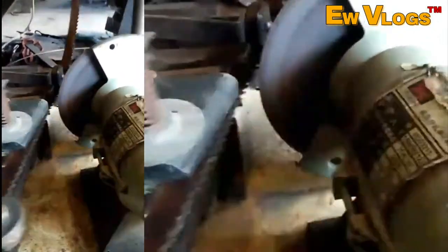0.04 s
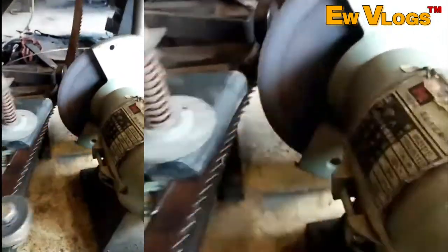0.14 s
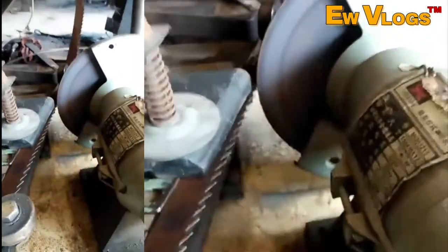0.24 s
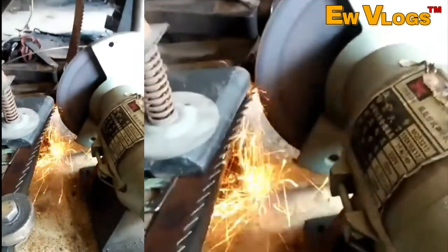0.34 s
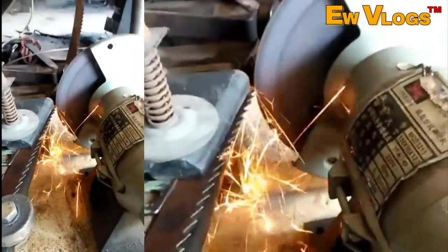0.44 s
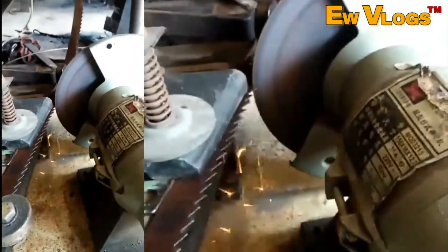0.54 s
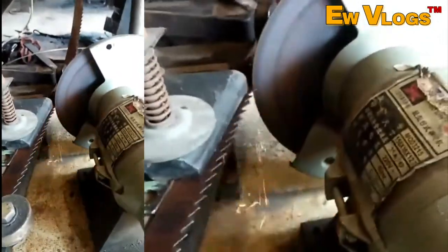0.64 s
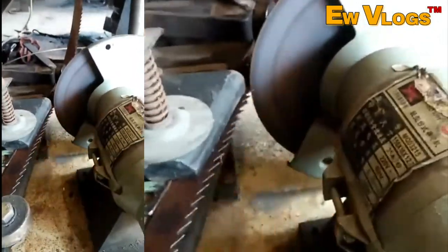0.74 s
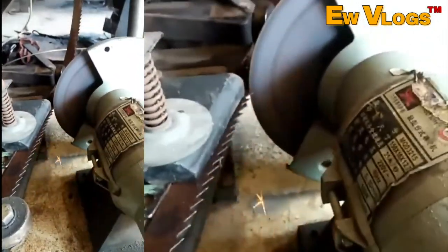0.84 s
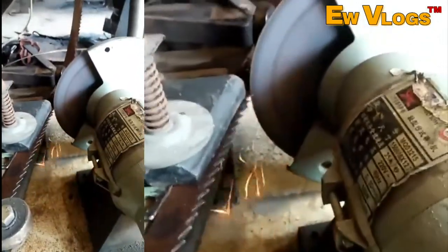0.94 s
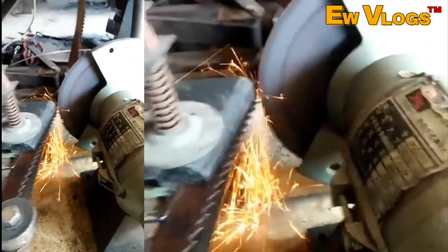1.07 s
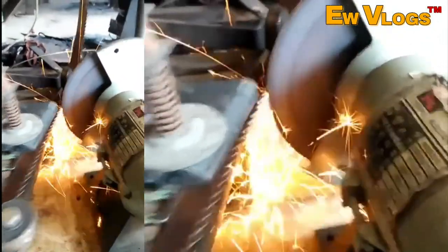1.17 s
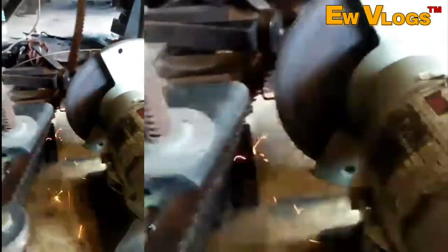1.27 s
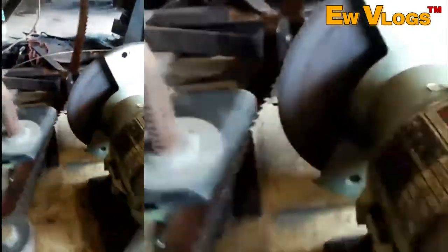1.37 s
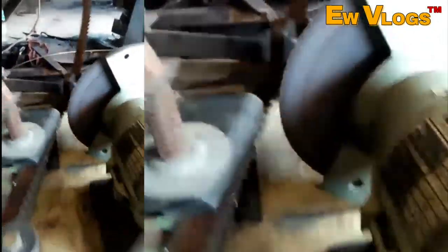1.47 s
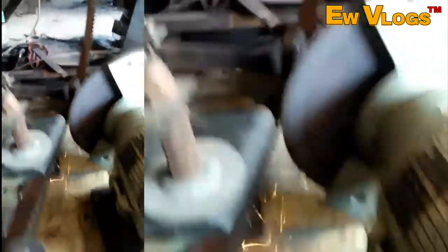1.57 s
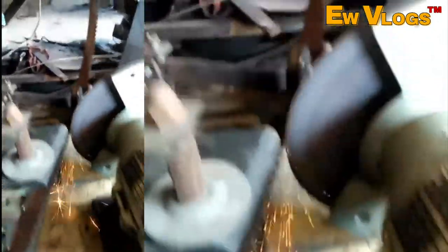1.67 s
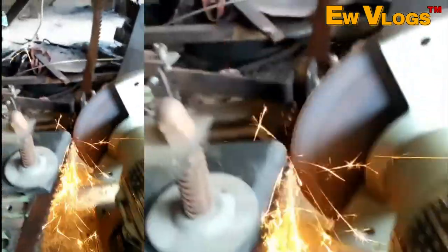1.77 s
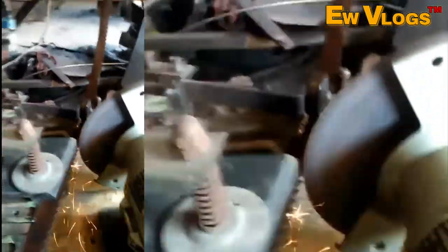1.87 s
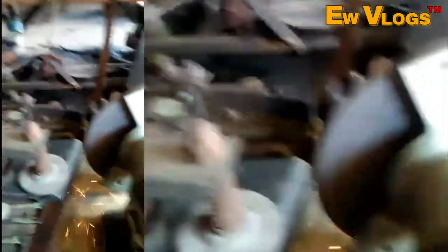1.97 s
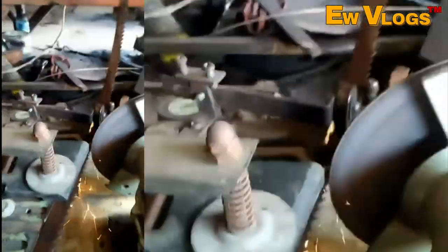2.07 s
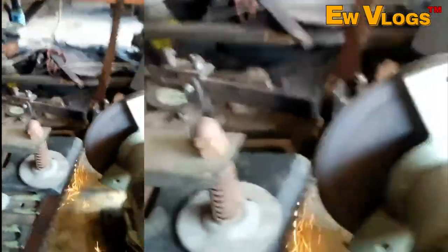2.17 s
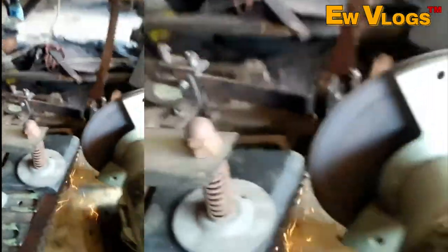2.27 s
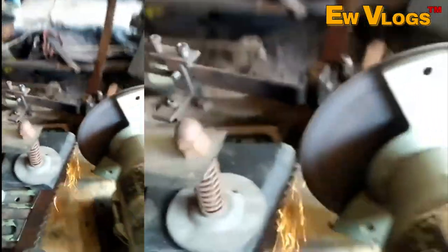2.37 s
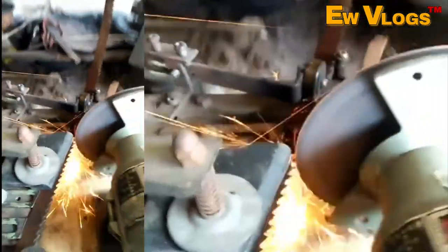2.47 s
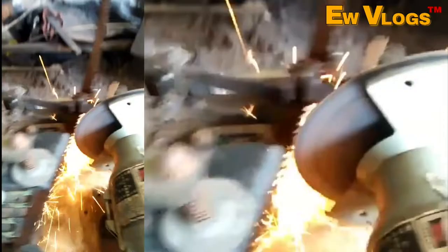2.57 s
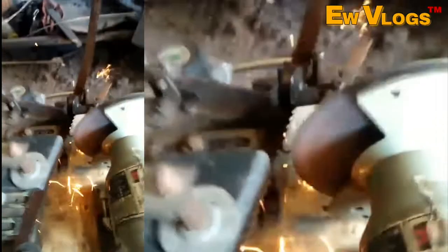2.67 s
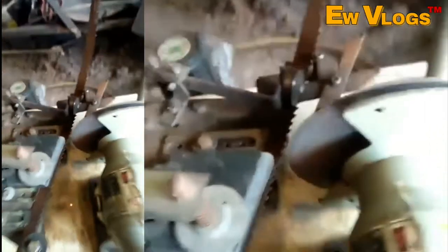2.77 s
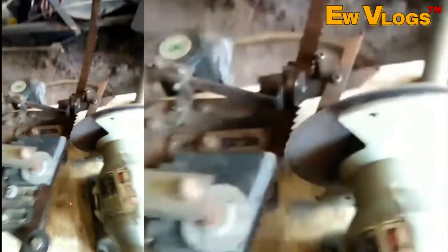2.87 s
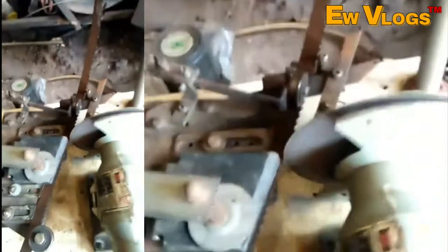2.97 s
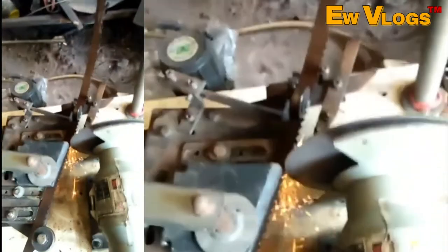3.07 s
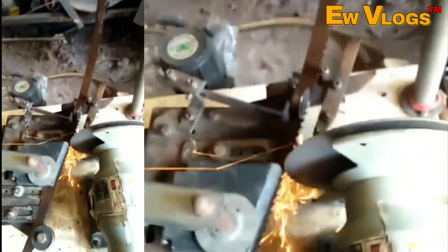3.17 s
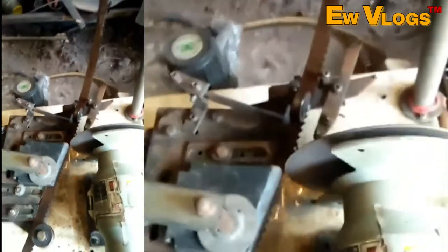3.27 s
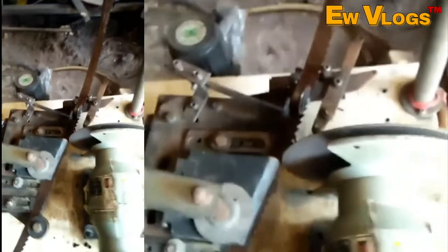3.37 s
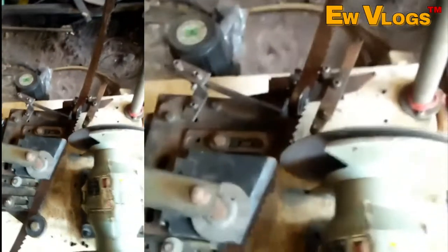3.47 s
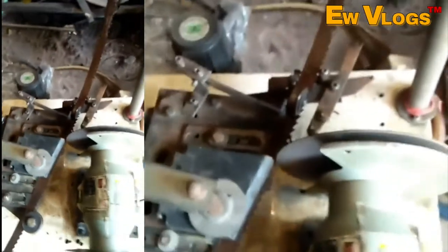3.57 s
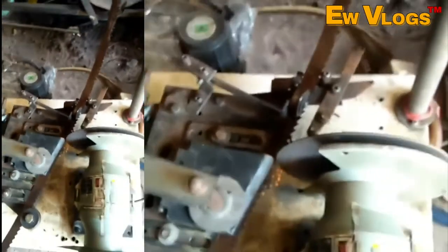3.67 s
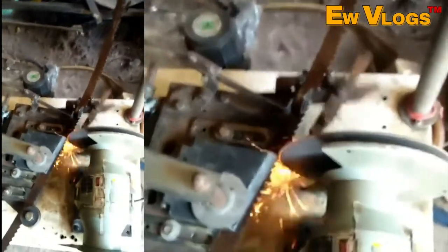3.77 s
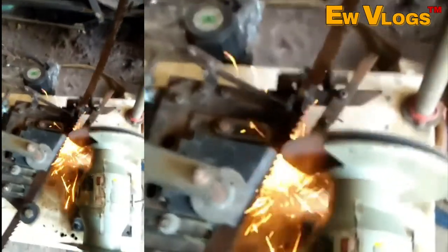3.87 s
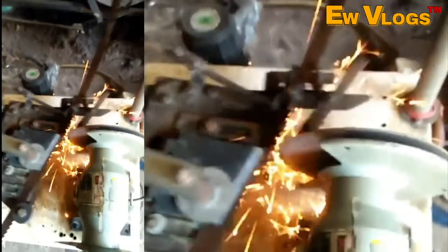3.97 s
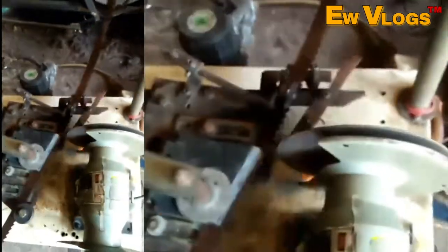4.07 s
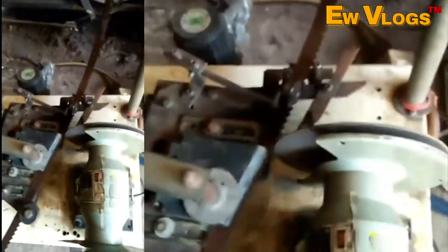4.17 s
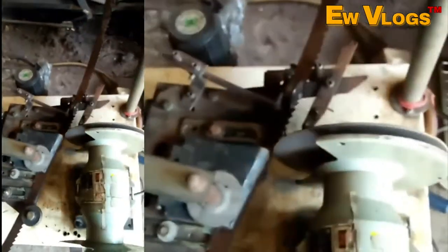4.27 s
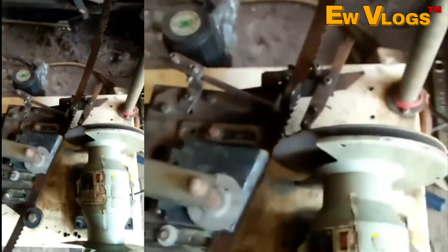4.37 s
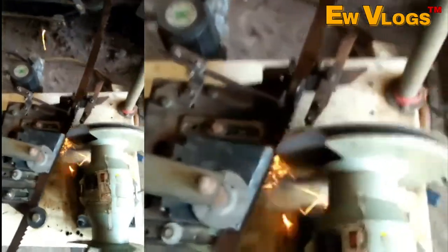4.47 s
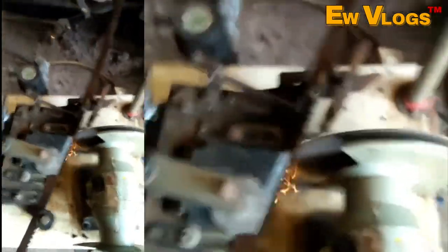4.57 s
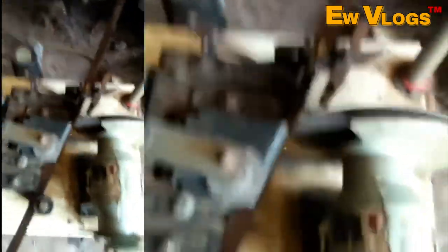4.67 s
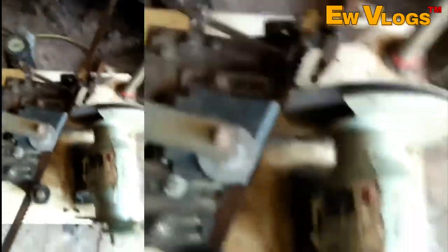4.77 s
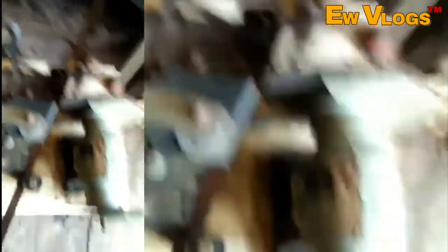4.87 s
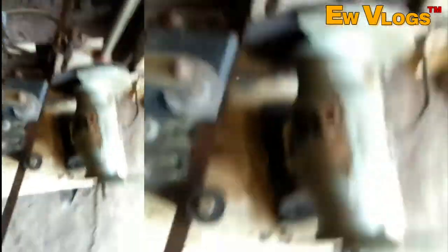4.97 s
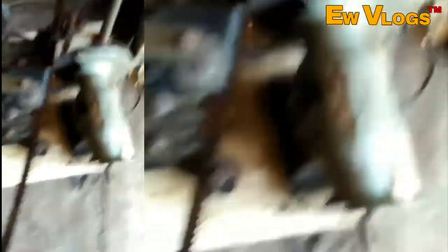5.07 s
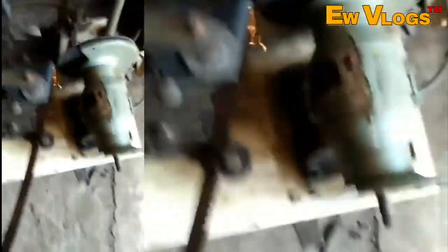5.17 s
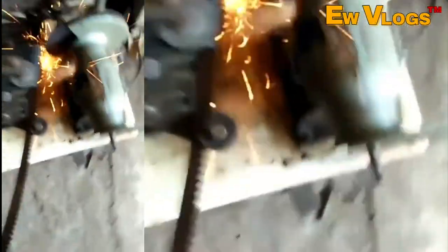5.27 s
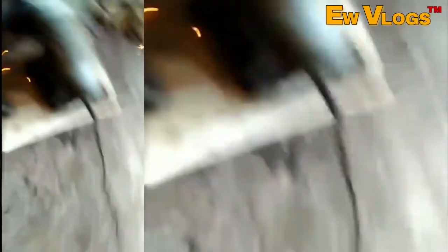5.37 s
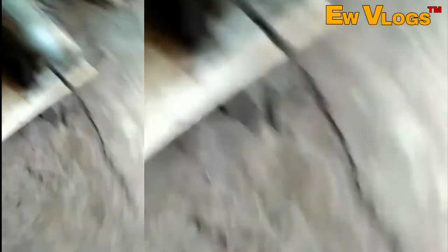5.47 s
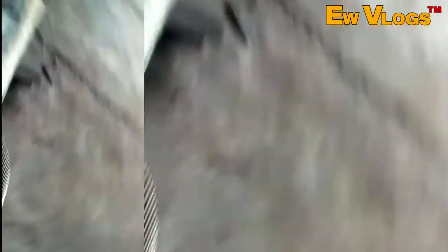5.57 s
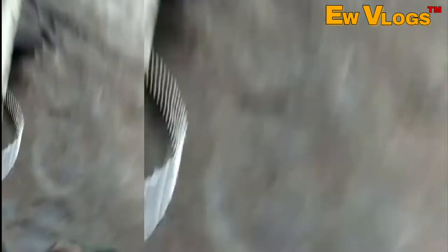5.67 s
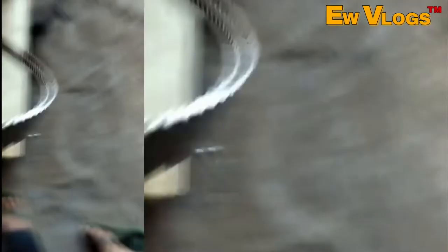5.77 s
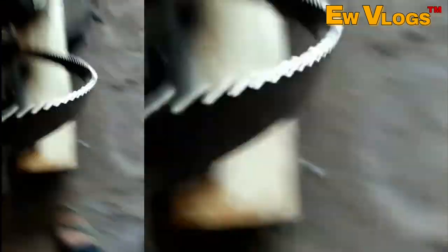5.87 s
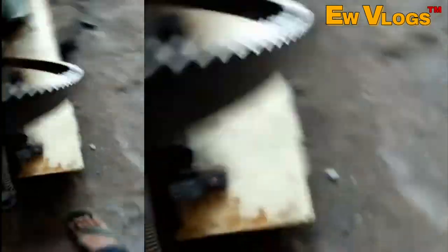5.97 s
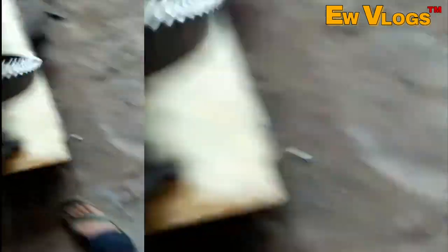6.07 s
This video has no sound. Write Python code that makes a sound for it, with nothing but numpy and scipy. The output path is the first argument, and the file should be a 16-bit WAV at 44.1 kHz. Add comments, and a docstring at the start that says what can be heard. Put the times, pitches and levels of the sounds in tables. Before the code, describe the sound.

A grinding wheel sharpens a steel saw blade, close up in a small, slightly reverberant workshop. A quiet motor hum and rattling gear rumble swell and ease throughout, with occasional dull knocks. After a brief bite at the very start, a loud, rapidly chattering rasp with a ringing metallic squeal runs from 0.5 seconds to a deep bite at 1.3. A fuller, continuous rasp follows from 1.7 to 2.7 seconds, ending in another deep bite. The clamp groans low under the heaviest bites. Lighter, brighter chattering scrapes come between 3.2 and 3.9 seconds, then a hard bite at 4. Stuttering grazes and short squealing brushes run from 4.5 to 5.3 seconds, leading into a loud bite at 5.4. A last rasp sounds around 6 seconds. The microphone overloads slightly on the loudest moments.

```python
"""A bench-grinder wheel sharpens a band-saw blade, tooth after tooth, in a small workshop.
The wheel runs out of true: a light cut chatters once a turn, a deep one rasps without pause as the
wheel speed sags. Grit scrapes the steel, the blade rings and squeals, and its clamp groans.
Underneath, the motor hums and the feed gear rumbles and knocks between teeth.
The close microphone overloads on the loudest bites."""
import sys
import numpy as np
from scipy import signal
from scipy.fft import rfft, irfft, next_fast_len
from scipy.io import wavfile
from scipy.ndimage import uniform_filter1d

SR = 44100
rng = np.random.default_rng(int(sys.argv[2]) if len(sys.argv) > 2 else 0)


def wav_out(sig):
    """Save sig, one row per channel (or a flat mono array), as 16-bit PCM at SR to the path in sys.argv[1]."""
    wavfile.write(sys.argv[1], SR, np.round(np.clip(np.atleast_2d(sig).T, -1, 1) * 32767).astype(np.int16))


N = 269449
TIME = np.arange(N) / SR
BINS = np.fft.rfftfreq(8192, 1 / SR)
RINGING_PASS, RASPING_PASS, LIGHT_GRAZE, DEEP_BITE = range(4)  # tone colour of each grind
CUT_ENVELOPE = dict(attack_s=0.0075, release_s=0.0033, ease_db=-5)

# Wheel speed, sagging in the deep cuts: (time [s], speed [turns/s])
WHEEL_SPEED = [(0, 50.15), (.45, 48.79), (.6, 48.79), (.8, 49.51), (1.25, 49.68), (1.4, 47.43),
               (1.75, 49.68), (1.95, 47.24), (2.25, 49.19), (2.55, 49.14), (2.8, 47.79), (3.3, 49.37),
               (3.9, 49.61), (4.1, 47.56), (4.55, 49.29), (5.3, 49.56), (5.5, 48.16), (6.11, 49.2)]
# Deep plunges of the wheel: (start [s], length [s], force [dB], clamp groan [dB])
DEEP_PLUNGES = [(0, 0.037, -0.5, -22), (1.276, 0.1, 0, -7.5), (2.643, 0.099, 0.5, -8.5),
                (3.941, 0.036, -12.5, -25.5), (3.988, 0.11, 0, -8.5), (5.361, 0.15, 0, -16),
                (5.97, 0.11, -8.5, -42)]
# Cuts along a tooth: (start [s], length [s], force [dB], contact half-width at the bite [turns],
# half-width once settled [turns], timbre [RINGING_PASS, RASPING_PASS or LIGHT_GRAZE])
TOOTH_CUTS = [(0.5, .485, -2, 0.26, 0.056, 0), (.988, 0.31, 1, 0.038, 0.095, 0),
              (1.742, 0.116, 1.5, 0.16, 0.13, 1), (1.86, .25, -3, 0.3, 0.4, 1),
              (2.11, .35, 1, 0.16, .18, 1), (2.461, 0.23, 0, .15, 0.18, 1),
              (3.242, 0.25, -9.5, 0.2, 0.11, 2), (3.73, 0.2, -15, 0.12, 0.12, 2),
              (4.602, 0.19, -6, 0.13, 0.064, 2), (4.98, .17, -47, .33, .3, 2),
              (5.962, 0.21, -7.5, 0.16, 0.79, 2)]
# Runs of grazes by the wheel's high spot: (start [s], grazes [count], spacing [half-turns],
# force [dB], step per graze [dB], timbre [RINGING_PASS or LIGHT_GRAZE])
GRAZE_RUNS = [(.422, 2, 4, -12, 0, 0), (1.727, 1, 0, -7, 0, 0), (3.535, 2, 2, -10.5, -7, 2),
              (3.596, 2, 2, -26, -2, 2), (3.947, 1, 0, -5, 0, 2), (4.476, 1, 0, -26.5, 0, 2),
              (4.516, 3, 4, -17.5, -2.5, 2), (4.651, 1, 0, -5, 0, 2), (4.757, 1, 0, -7, 0, 2),
              (4.862, 2, 1, -15.5, 0, 2), (5.155, 2, 1, -21, 0, 2), (5.196, 2, 1, -19, 2, 2),
              (4.952, 2, 1, -28, -3, 2), (5.114, 2, 1, -37, -6, 2), (5.273, 2, 1, -24, 12, 2),
              (5.326, 3, 1, -16.5, 4.5, 2)]
# Tone of the grit under a firm contact: (frequency [Hz], level [dB])
FIRM_GRIT_EQ = [(30, -38), (95, -25), (190, -22), (450, -13), (850, 2.5), (1400, -3), (2200, 1), (2700, -5),
                (3400, -20.5), (4500, -15.5), (6500, -18), (9000, -15.5), (12500, -21.5), (16000, -43)]
# Brighter tone of the grit under a light contact: (frequency [Hz], level [dB])
LIGHT_GRIT_EQ = [(30, -48), (90, -14), (190, -14.5), (450, -18), (850, 0), (1400, -4.5), (2200, 0.5),
                 (2700, -4), (3400, -22.5), (4500, -16.5), (6500, -7.5), (9000, -8.5), (12500, -10),
                 (16000, -39)]
# Modes of the clamped blade: (frequency [Hz])
MODE_HZ = [450, 790, 1060, 1500, 1970, 2240, 2470, 2690, 3050, 3890, 4910, 5620, 5800, 6110, 6860, 7250,
           7600, 8020, 8440, 9000, 9600, 10600, 12600]
# Each mode's boost per tone colour:
# (width [Hz], ringing pass [dB], rasping pass [dB], light graze [dB], deep bite [dB])
MODE_BOOSTS = [(79, 2, 8, 7, 2), (120, 1.5, -1.5, 3, -3), (152, 4, 2.5, -6, 3), (114, 3.5, 6, 3, 7),
               (165, 12, 5.5, 8, 9), (92, 11.5, -8, 12.5, 0), (130, 4.5, 11.5, 7, 3.5),
               (100, 0.5, 1.5, 0, -2.5), (130, 5.5, 10.5, 5, 4.5), (138.89, 9.5, 8.5, 5, 3),
               (280, 18.5, 6, 2, 3.5), (130, 16.5, 8, 8.5, -6), (130, 12.5, 6.5, 5, 2),
               (260, 19, 9.5, 8.5, 9.5), (304, 9.5, 7, 9, 7), (270, 3, 2, -2.5, 1),
               (200, 10.5, 4.5, 4.5, 4.5), (300, 2.5, -3, 7, 1), (148, 7.5, 5, 3, -2),
               (270, 4.5, -6, 5, -5), (355, -3, -3, -5, -11), (900, 1, 0.5, 1, -6),
               (405, 11, -2, -1.5, -35)]
# Modes rubbed into a squeal: (start [s], end [s], mode [index in MODE_HZ], level [dB])
BLADE_SQUEALS = [(0.2, 1.394, 4, 3), (0.695, 1.295, 12, -2), (1.712, 1.85, 3, -4.5), (1.85, 2.663, 4, -2.5),
                 (2.06, 2.66, 6, -13), (2.206, 2.645, 2, -4.5), (2.38, 2.62, 10, -12),
                 (3.194, 3.585, 6, -8), (3.148, 4.05, 5, -1.5), (4.502, 5.62, 4, -2), (5.918, 6.143, 4, -3),
                 (5.927, 6.141, 10, -17)]
# Strokes of the feed: (time of peak effort [s], level [dB])
FEED_STROKES = [(0, -36.5), (1.2, -21), (2.65, -27.5), (3.3, -31), (3.75, -23.5), (5.65, -35.5)]
# Tone of the gear noise: (frequency [Hz], level [dB])
GEAR_EQ = [(25, -52), (60, -36), (100, -45), (160, -36), (240, -28), (310, -27.5), (450, -11), (620, -9),
           (1000, 1.5), (1400, -8.5), (1950, -6.5), (2350, -27), (2620, -12.5), (3000, -23), (3500, -30),
           (6400, -41), (9000, -42), (15000, -52)]
# Hum of the motor and frame: (frequency [Hz], level [dB])
MOTOR_TONES = [(99, -34.5), (297, -20), (444, -13), (590, -11.5), (780, -10), (972, -5), (1215, -8.5),
               (1480, -7), (1925, -21), (2620, -21)]
# Resonances of the clamp: (frequency [Hz], half-width [Hz], level [dB])
CLAMP_MODES = [(96, 50, -15.5), (307, 34, -4), (450, 32.5, 1.5), (602.4, 23, 5), (780, 65, 2.5)]
# Knocks of the feed pawl and wheel arm: (time [s], level [dB], pitch [Hz], 60 dB decay [s])
FEED_KNOCKS = [(0.409, -21, 780, 0.075), (0.493, -39, 700, .05), (0.612, -18, 130, 0.055),
               (1.453, -22, 1020, 0.1), (2.1, -9.5, 120, 0.04), (3.006, -19.5, 900, 0.1),
               (5.87, -29, 1220, 0.11), (5.939, -26, 644, 0.1)]
# Reverb time of the workshop: (frequency [Hz], 60 dB decay [s])
ROOM_DECAY = [(60, 0.24), (300, 0.16), (1000, 0.56), (2000, 0.52), (4000, 0.46), (8000, 0.48),
              (15000, 0.23)]


def gain_of(db):
    """Decibels to gain."""
    return 10 ** (np.asarray(db) / 20)


def unit_rms(x):
    """Scales to rms 1."""
    return x / np.sqrt(np.mean(x ** 2) + 1e-20)


def curve_at(points, hz):
    """Joins (frequency, value) points on a log-frequency axis."""
    point_hz, value = np.transpose(points)
    return np.interp(np.log(hz + 1), np.log(point_hz + 1), value)


def drift(rate_hz):
    """Smooth random modulation of rms 1, rolling off above rate_hz."""
    size = next_fast_len(N)
    lowpass = np.exp(-(np.fft.rfftfreq(size, 1 / SR) / rate_hz) ** 2)
    return unit_rms(irfft(rfft(rng.standard_normal(size)) * lowpass, size)[:N])


def colour(x, eq_db):
    """Minimum-phase EQ of unit energy, shaped by eq_db on BINS."""
    log_gain = np.log(gain_of(np.r_[eq_db, eq_db[-2:0:-1]]))
    taps = np.fft.ifft(np.exp(np.conj(signal.hilbert(log_gain)))).real[:len(eq_db)]
    return signal.oaconvolve(x, taps / np.linalg.norm(taps))[:N]


def lean(start, length, attack_s, release_s, ease_db):
    """The wheel leans in, eases off as the steel goes and lifts away."""
    age = np.maximum(TIME - start, 0)
    held = np.minimum(age / attack_s, 1) * gain_of(ease_db * np.minimum(age / length, 1))
    return held * np.exp(-np.maximum(age - length, 0) / release_s)


def chatter(half_width):
    """The high spot presses once a turn; a wider contact fills the gaps between pulses."""
    turns = np.cumsum(np.interp(TIME, *np.transpose(WHEEL_SPEED))) / SR
    return np.exp(-.5 * (np.sin(np.pi * turns) / np.pi / half_width) ** 2)


def plunge_force(uneven_db=2):
    """The wheel bites deep and stays in contact all the way round."""
    force = sum(gain_of(db) * lean(start, length, attack_s=0.011, release_s=0.02, ease_db=-2.5)
                for start, length, db, _ in DEEP_PLUNGES)
    return force * chatter(half_width=0.48) * gain_of(uneven_db * drift(36))


def rasp(force, tones, grit_eq, timbre, grit_db, grain_db, ring_s=0.0017):
    """Uneven grits scrape the steel and ring the blade; the squeal tones lag just behind the force."""
    grits = unit_rms(rng.standard_normal(N) * gain_of(grain_db * drift(1110)))
    modes_db = sum(boosts[timbre] / (1 + (2 * (BINS - hz) / width) ** 2)
                   for hz, (width, *boosts) in zip(MODE_HZ, MODE_BOOSTS))
    scrape = colour(force * grits, curve_at(grit_eq, BINS) + modes_db)
    pole = np.exp(-1 / (ring_s * SR))
    lagged_force = signal.lfilter([1 - pole], [1, -pole], force)
    return gain_of(grit_db) * scrape + lagged_force * tones


def grinding():
    """The wheel on the steel, layered in four tone colours."""
    tones = squeal()
    ringing_force = cut_force(RINGING_PASS, uneven_db=2.3) + graze_force(RINGING_PASS)
    ringing = rasp(ringing_force, tones, FIRM_GRIT_EQ, RINGING_PASS, grit_db=1.5, grain_db=2.5)
    rasping_force = cut_force(RASPING_PASS, uneven_db=2.8)
    rasping = rasp(rasping_force, tones, FIRM_GRIT_EQ, RASPING_PASS, grit_db=1.0, grain_db=2)
    light_force = cut_force(LIGHT_GRAZE, uneven_db=4) + graze_force(LIGHT_GRAZE)
    light = rasp(light_force, tones, LIGHT_GRIT_EQ, LIGHT_GRAZE, grit_db=-1.0, grain_db=2.5)
    deep = rasp(plunge_force(), tones, FIRM_GRIT_EQ, DEEP_BITE, grit_db=-0.06, grain_db=3.0)
    return ringing + rasping + light + deep


def rattle(patchy_db):
    """Noise whose colour shifts from moment to moment, as loose parts shake in turn."""
    frames = signal.stft(rng.standard_normal(N), nperseg=1024, noverlap=768)[2]
    patches = uniform_filter1d(rng.standard_normal(frames.shape), size=4, axis=0)  # across frequency
    patches = unit_rms(uniform_filter1d(patches, size=7, axis=1))  # across time
    return unit_rms(signal.istft(frames * gain_of(patchy_db * patches), nperseg=1024, noverlap=768)[1][:N])


def feed_effort(idle_db=-39.5, build_db_per_s=22.5, slacken_db_per_s=20.5):
    """The motor and feed gear build up to each stroke and fall back to idling."""
    swells = [gain_of(db - np.maximum((peak - TIME) * build_db_per_s, (TIME - peak) * slacken_db_per_s))
              for peak, db in FEED_STROKES]
    return np.sqrt(gain_of(idle_db) ** 2 + np.sum(np.square(swells), axis=0))


def motor_and_gear(waver=.012, flutter_db=5.0, hum_db=-2):
    """A bed of rattling gear noise and wavering motor tones rides the effort of the feed."""
    gear = unit_rms(colour(rattle(patchy_db=4.5), curve_at(GEAR_EQ, BINS)))
    hum = np.zeros(N)
    for hz, db in MOTOR_TONES:
        level = gain_of(db + flutter_db * drift(8.5))
        pitch_hz = hz * (1 + waver * drift(28.3))
        hum += level * np.sin(2 * np.pi * np.cumsum(pitch_hz) / SR)
    return (gear + gain_of(hum_db) * hum) * feed_effort()


def clamp_strain(feed_db=-10, rasping_db=-17, swell_s=0.038):
    """The clamp takes load from the feed, from wide rasping passes and midway through a plunge."""
    rasping = sum(gain_of(db) * bite * lean(start, length, **CUT_ENVELOPE)
                  for start, length, db, bite, _, timbre in TOOTH_CUTS if timbre == RASPING_PASS)
    deep = sum(gain_of(db) * np.exp(-.5 * ((TIME - start - length / 2) / swell_s) ** 2)
               for start, length, _, db in DEEP_PLUNGES)
    return gain_of(feed_db) * feed_effort() + gain_of(rasping_db) * (rasping / rasping.max()) ** 2 + deep


def clamp_groan():
    """Sliding friction heard through the low resonances of the clamp."""
    body = sum(gain_of(db) / (1 + ((BINS - hz) / half_width) ** 2) for hz, half_width, db in CLAMP_MODES)
    return colour(rattle(patchy_db=7), 20 * np.log10(body)) * clamp_strain()


def squeal(wander_hz=36):
    """Rubbing makes the blade's modes sing: jittery tones that swell in and out."""
    tones = np.zeros(N)
    for start, end, mode, db in BLADE_SQUEALS:
        progress = np.clip((TIME - start) / (end - start), 0, 1)
        swell = np.sqrt(np.maximum(np.sin(np.pi * progress), 0))
        pitch_hz = MODE_HZ[mode] + wander_hz * drift(123.5)
        tones += gain_of(db) * swell * unit_rms(np.sin(2 * np.pi * np.cumsum(pitch_hz) / SR))
    return tones


def knocks():
    """Dull blows of the pawl and arm: each a noise burst through a broad resonance of the frame."""
    blows = np.zeros(N)
    for start, db, hz, t60 in FEED_KNOCKS:
        envelope = (TIME >= start) * gain_of(db - 60 * np.maximum(TIME - start, 0) / t60)
        half_width_hz = 55 + 0.053 * hz
        frame_db = -20 * np.log10(1 + ((BINS - hz) / half_width_hz) ** 2)
        blows += colour(envelope * rng.standard_normal(N), frame_db)
    return blows


def graze_force(timbre, rise_s=0.0026):
    """Quick brushes against the tooth, single or repeating in step with the wheel."""
    force = np.zeros(N)
    for start, count, half_turns, db, step_db, graze_timbre in GRAZE_RUNS:
        if graze_timbre == timbre:
            gap_s = half_turns / 2 / np.interp(start, *np.transpose(WHEEL_SPEED))
            for k in range(count):
                rise = np.maximum(TIME - start - k * gap_s, 0) / rise_s
                force += gain_of(db + k * step_db) * (rise * np.exp(1 - rise)) ** 2
    return force


def cut_force(timbre, uneven_db, settle_share=0.5):
    """Each cut bites fast, then its chatter tightens or broadens as the contact settles."""
    force = np.zeros(N)
    for start, length, db, bite, settled, cut_timbre in TOOTH_CUTS:
        if cut_timbre == timbre:
            unsettled = np.exp(-((TIME - start) / (settle_share * length)) ** 2)
            half_width = settled + (bite - settled) * unsettled
            force += gain_of(db) * lean(start, length, **CUT_ENVELOPE) * chatter(half_width)
    return force * gain_of(uneven_db * drift(40))


def workshop(x, bench_s=.0038, bench_db=-10, tail_db=-8, build_s=0.0012):
    """One early reflection off the bench, then a diffuse tail that lingers longest in the mids."""
    hz, age, frames = signal.stft(rng.standard_normal(SR), SR, nperseg=256)
    decay = gain_of(-60 * age / curve_at(ROOM_DECAY, hz)[:, None])
    impulse = signal.istft(frames * decay, SR, nperseg=256)[1]
    impulse *= 1 - np.exp(-np.arange(len(impulse)) / SR / build_s)
    tail = signal.fftconvolve(x, impulse / np.linalg.norm(impulse))[:N]
    bench = np.interp(TIME - bench_s, TIME, x, left=0)
    return x + gain_of(bench_db) * bench + gain_of(tail_db) * tail


def scene():
    """Mono mix: grinding and knocks in the room, over the dry machine bed and clamp groan."""
    return (workshop(grinding() + knocks()) + motor_and_gear() + clamp_groan())[None]


def record(dry, threshold_db=-9.0, detector_fall_db_per_s=250, squash=0.61, ceiling=0.74, cutoff_hz=15700):
    """Close-microphone overload: fast compression, soft clipping of the peaks, then a steep low-pass."""
    power_db = 10 * np.log10(abs(uniform_filter1d(dry[0] ** 2, size=130)) + 1e-12)
    fall_db = TIME * detector_fall_db_per_s
    detector_db = np.maximum.accumulate(power_db + fall_db) - fall_db
    over_db = np.maximum(detector_db - threshold_db, 0)
    compressed = dry / gain_of(squash * uniform_filter1d(over_db, size=60))
    clipped = compressed / (1 + (compressed / ceiling) ** 8) ** (1 / 8)
    lowpass = signal.firwin(401, cutoff_hz, window=("kaiser", 9), fs=SR)
    return signal.oaconvolve(clipped, lowpass[None], "same")


dry = scene()
out = record(dry)
wav_out(out)
```